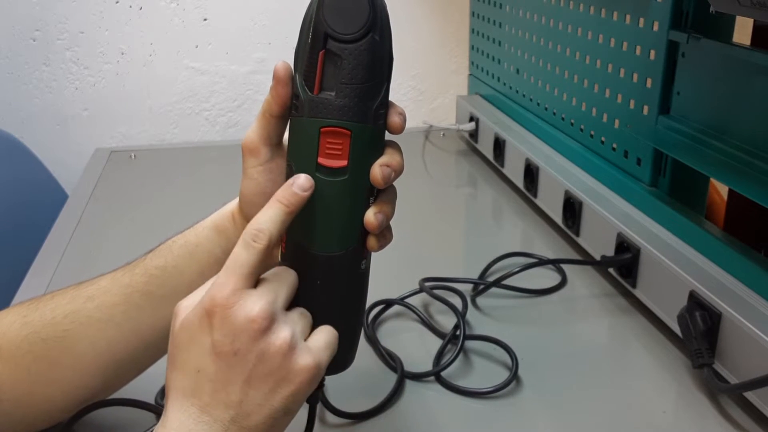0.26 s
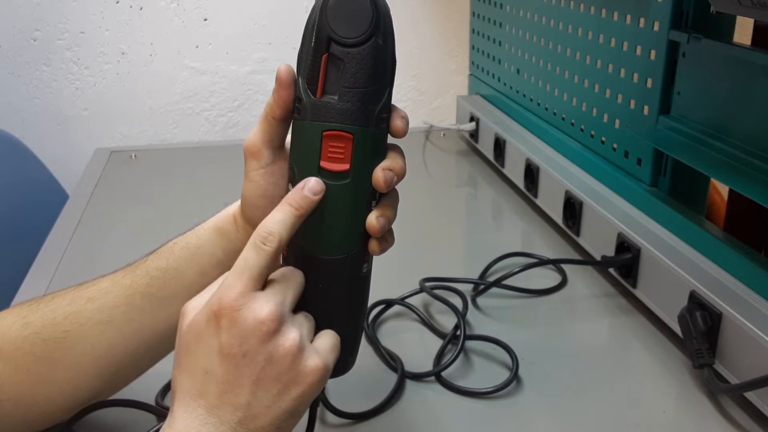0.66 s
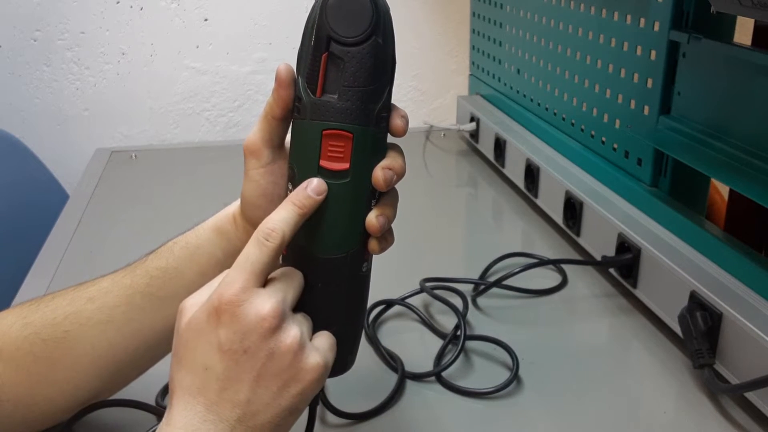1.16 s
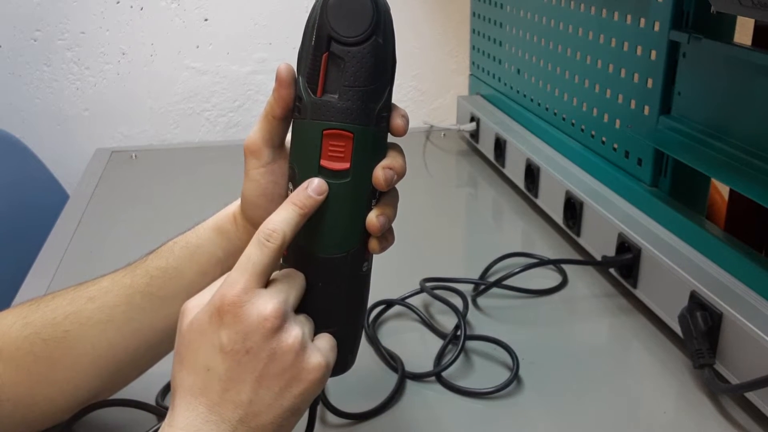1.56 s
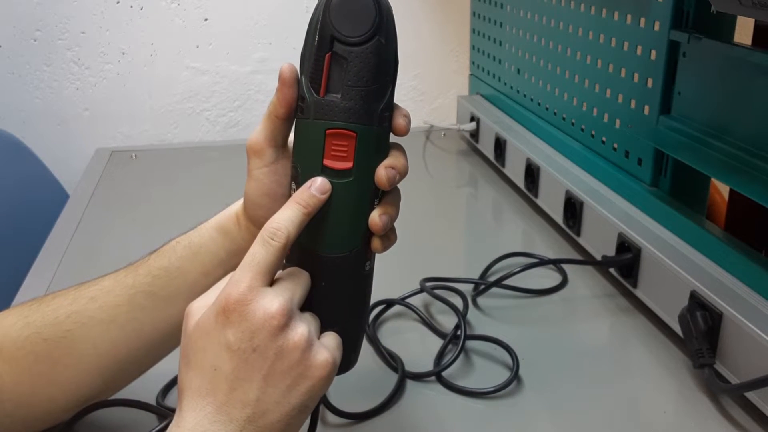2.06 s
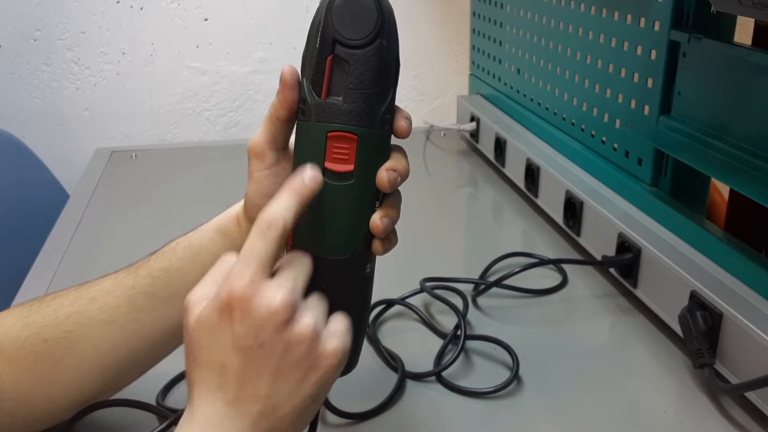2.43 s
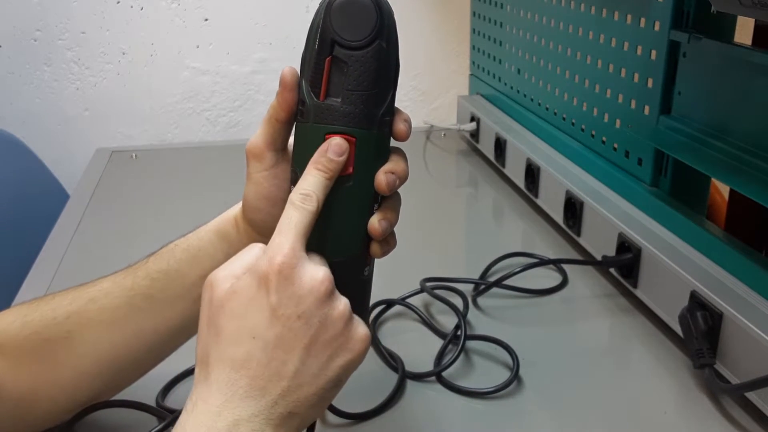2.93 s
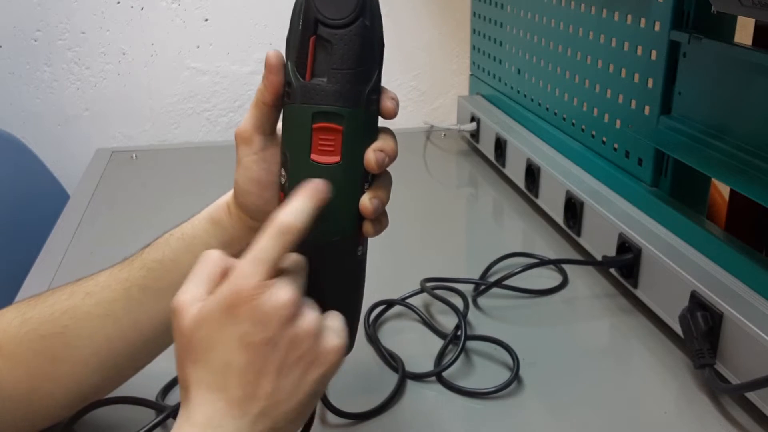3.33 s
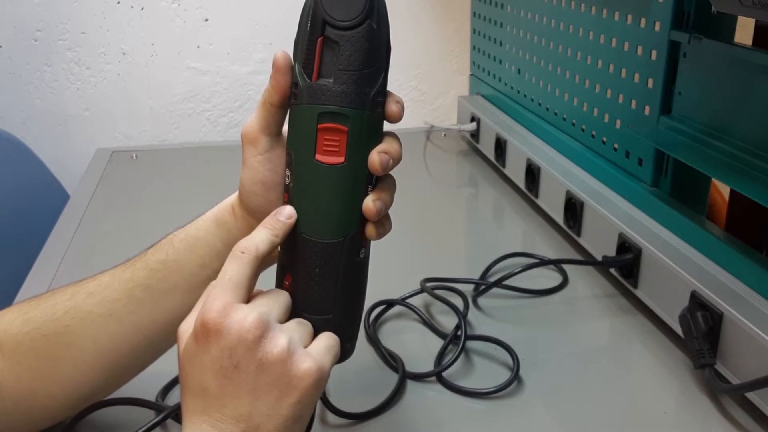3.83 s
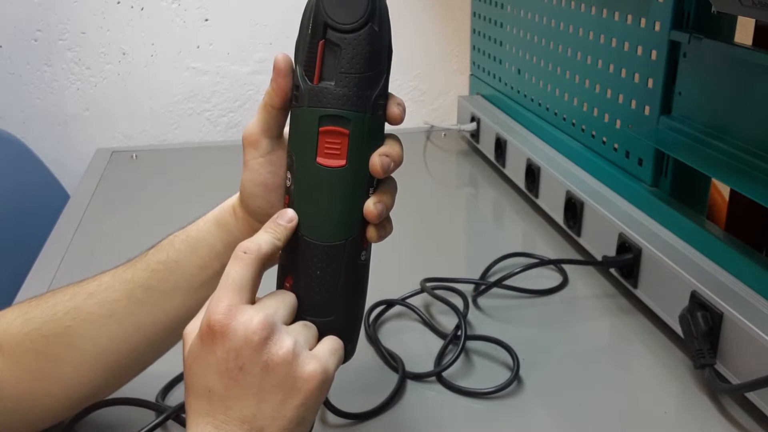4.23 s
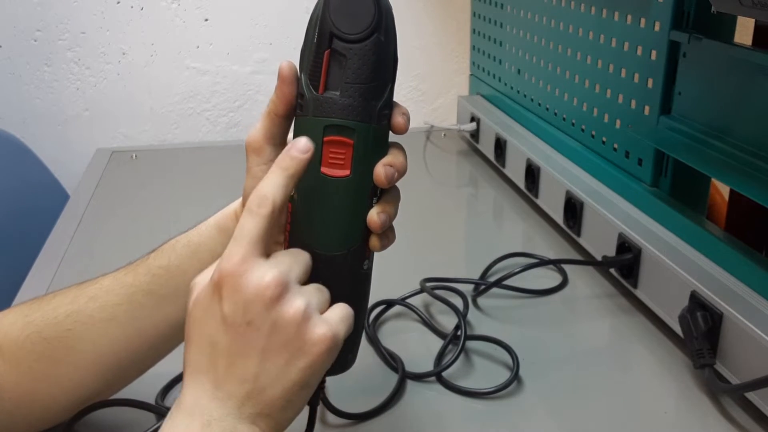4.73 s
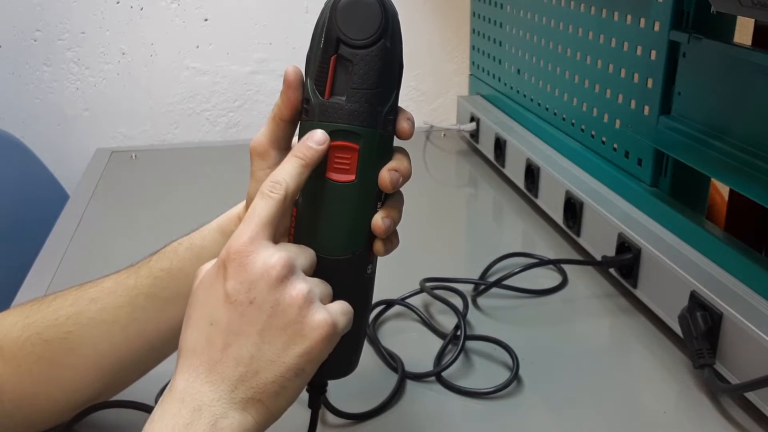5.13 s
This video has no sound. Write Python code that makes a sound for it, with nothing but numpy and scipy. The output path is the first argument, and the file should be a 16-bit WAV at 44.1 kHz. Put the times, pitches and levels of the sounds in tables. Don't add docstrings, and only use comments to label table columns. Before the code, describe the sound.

A handheld oscillating power tool runs unloaded very close to the microphone, a steady harsh buzz with whining motor and fan tones, plastic rattle and airy hiss. About three seconds in it is switched off; the whine slides down, knocks slow and fade over a second and a half. A couple of tiny ticks follow, with low ventilation rumble in a small workshop.

```python
import sys
import numpy as np
from scipy import signal
from scipy.fft import rfft, irfft, next_fast_len
from scipy.io import wavfile
from scipy.ndimage import uniform_filter1d

SR = 44100
rng = np.random.default_rng(int(sys.argv[2]) if len(sys.argv) > 2 else 0)


def inscribe(sig):
    pcm = np.round(np.clip(np.atleast_2d(sig).T, -1, 1) * 32767)
    wavfile.write(sys.argv[1], SR, pcm.astype(np.int16))


def makeup_ratio(level_db):
    decades = np.asarray(level_db, float) / 20
    return 10 ** decades


N = 237258
t = np.arange(N) / SR
size = next_fast_len(N + SR)
bins = np.maximum(np.arange(size // 2 + 1) * SR / size, 1.)

SWITCH_S = 3.03
FAN_ORDER = 39
# (time [s], seating [-1.5 slack to 1.5 tight])
SEATING = [
    (.05, 1),
    (.4, 1.2),
    (.65, 0),
    (1.25, -1.3),
    (1.55, -.6),
    (1.85, -1),
    (2.45, 0),
    (2.97, .6),
]


def tool():
    # (time [s], turns per second [Hz])
    speed = [(0, 282.0), (.4, 282.4), (.7, 283.0), (1.3, 283.6), (1.7, 283.4), (2.4, 283.6), (2.75, 284.1),
             (3.02, 284.3), (3.08, 273), (3.16, 257), (3.36, 224.6), (3.5, 202), (3.82, 144.5),
             (4.11, 94.5), (4.3, 66), (4.55, 28), (4.75, 2)]
    # (time [s], rise [dB], half length [s])
    squeezes = [
        (.27, 6, 0.032),
        (1.362, 4.5, 0.046),
        (1.988, 3, 0.065),
        (2.55, 3, 0.12),
        (3.42, 4.5, .06),
    ]
    # (frequency [Hz], level [dB per Hz])
    body = [(150, -33.5), (250, -8.5), (450, -12.5), (735, -11), (1400, -0.5), (2200, -1), (3200, -2.5),
            (4500, -4.5), (5700, -1.5), (7000, -5), (8500, -11), (11500, -14.5), (13500, -15),
            (15600, -15.5)]
    # (frequency [Hz], width [Hz], boost [dB])
    housing = [(400.4, 47, 12.5), (556, 187, 10.5), (978.5, 35, 12.5), (1227, 130, 0.5), (1390, 110, 5),
               (1547, 87, 3.5), (2027, 180, -0.5), (2600, 50, 7.5), (3460, 60, 2), (4970, 52, 8),
               (5397, 64, 4), (5370, 82, 6), (7660, 110, 6), (11370, 660, 8), (720, 110, -1.5),
               (4520, 370, -4)]

    hz = np.interp(t, *np.transpose(speed))
    turns = np.cumsum(hz) / SR + .0016 * walk(20)

    grip_db = layer_db(hz, full_db=-37, halving_db=4.4, stall_db=2.5)
    grip_db -= np.interp(t, *np.transpose(SEATING)) * (t < SWITCH_S)
    for at, rise_db, half in squeezes:
        grip_db += rise_db * np.exp(-((t - at) / half) ** 2)

    even = np.sqrt(SR / 2 / np.maximum(hz, 20.))
    blows = np.arange(int(2 * turns[-1]))
    clean_db = np.interp(t, [SWITCH_S, SWITCH_S + 0.24, 3.5, 3.8, 4.2], [-38.5, -5.5, -13.5, -10.0, -11])
    clean = makeup_ratio(clean_db) * even * knocks(np.maximum.accumulate(turns), 1.1, .002, (-1.) ** blows)
    either_way = rng.choice([-1., 1.], len(blows))
    loose = makeup_ratio(-8.0) * even * knocks(np.maximum.accumulate(turns), 2.9, 0.024, either_way)

    gate = .7 + np.exp(-(2 * turns % 1) / .3)
    hiss = unit(gate * (rng.standard_normal(N) + 0.843 * rng.standard_normal((2, N))))

    colour_db = curve(body, bins)
    for ring_hz, width_hz, boost_db in housing:
        colour_db = colour_db + boost_db / (1 + (2 * (bins - ring_hz) / width_hz) ** 2)
    colour = causal(colour_db)

    rattle_db = layer_db(hz, full_db=-28.5, halving_db=5.74, stall_db=1.87) + 0.38 * walk(12)
    rattle = unit(shape(clean + loose + hiss, colour * band(1450, 3240))) * makeup_ratio(rattle_db)
    chatter_db = layer_db(hz, full_db=-29, halving_db=5.8, stall_db=2.6) + 1.2 * walk(12)
    chatter = unit(shape(clean + loose + hiss, colour * band(3760, 6500))) * makeup_ratio(chatter_db)
    air_db = layer_db(hz, full_db=-28.5, halving_db=11.7, stall_db=1.4) + .7 * walk(30)
    air = unit(shape(0.59 * loose + hiss, colour * band(7200, 20000))) * makeup_ratio(air_db)
    rumble = loose + rng.standard_normal(N)
    grip = unit(shape(rumble, colour * band(270, 1406))) * makeup_ratio(grip_db + 1.9 * walk(8.46))

    held, sliding = whine(turns, hz)
    heard = ports(rattle + chatter + air + grip + sliding) + held
    return heard + spindle(loose + hiss, hz)


def whine(turns, hz):
    # (multiple of shaft speed, left level [dB], right level [dB], left lead [radians])
    strong = [(1, -45, -59, 2.9), (2, -50, -50, -0.1), (3, -46, -46, -0.5), (4, -47, -62, 0.5),
              (5, -30, -36, 2.1), (6, -42, -46, -0.7), (7, -36, -31, -2.0), (8, -40, -47, 1.7),
              (9, -33, -36, -3.0), (10, -47, -39, 1.5), (11, -40, -38, -0.3), (12, -42, -37, -2.9),
              (13, -31, -35, 0.8), (15, -43, -45, -1.5), (17, -42, -35, -2.6), (18, -35, -44, -2.1),
              (19, -35, -34, -3.1), (20, -34, -37, 0.1), (21, -39, -40, -1.0), (22, -41, -47, -0.2),
              (23, -43, -40, 2.6), (24, -37, -38, 0.3), (39, -36, -36, -0.0)]
    faint = [(14, -46, -47, 0), (16, -51, -51, 0), (25, -46, -48, 0), (29, -50, -50, 0), (31, -49, -48, 0)]
    leaders = {1: (.5, -2, 10), 5: (0, 5, 5), 7: (0, 3.5, 4), 9: (3.5, 0, 18), 11: (4, 5, 14),
               13: (-1.5, 8, 13), 20: (-3.5, 10, 35)}
    coast_fade = {3: 30, 15: 25, 17: 45, FAN_ORDER: 42}
    # (time [s], multiple, level [dB], half length [s])
    surges = [(.2, 7, -37, .3), (.48, 9, -39, .15), (1.39, 6, -34, .05), (1.36, 7, -35, .03),
              (2.26, 6, -38, .06), (2.26, 1, -45, .04), (3.36, 11, -38, .05), (3.47, 7, -43, .1),
              (2.8, 11, -43, .25), (3.25, 9, -39, .08), (3.06, 13, -38, .05), (3.25, 15, -40, .07),
              (3.32, 17, -43, .05), (.8, 5, -41, .35), (3.72, 3, -52, .12)]

    held, sliding = np.zeros((2, N)), np.zeros(N)
    power = np.clip((SWITCH_S - t) / 0.025 + 1, 0, 1)
    seating = np.interp(t, *np.transpose(SEATING))
    coasting_s = np.maximum(t - SWITCH_S, 0)
    for k, left_db, right_db, lead in strong + faint:
        start = (.7 if k % 2 else .9) * rng.standard_normal()
        angle = 2 * np.pi * k * turns + start + .12 * walk(25)
        flutter_db = (3.0 - 2.2 * power) * walk(12)
        if k in leaders:
            seat_db, drop_db, fade_db = leaders[k]
            flutter_db += power * seat_db * seating - (1 - power) * drop_db - fade_db * coasting_s
            lowest_hz = 1300 if k > 1 else 70
            flutter_db -= 42 * np.maximum(np.log2(lowest_hz / np.maximum(k * hz, 1)), 0)
        else:
            wander_db = .8 if k == FAN_ORDER else 2.1
            flutter_db += wander_db * walk(3.01) - coast_fade.get(k, 400) * coasting_s
        wave = np.sqrt(2) * makeup_ratio(flutter_db) * np.exp(1j * angle)
        left = makeup_ratio(left_db) * np.exp(.5j * lead)
        right = makeup_ratio(right_db) * np.exp(-.5j * lead)
        held += power * np.real(wave * np.array([[left], [right]]))
        coast = (1 - power) * wave.real * np.hypot(makeup_ratio(left_db), makeup_ratio(right_db)) / np.sqrt(2)
        direct = 1 if k in (1, 3, FAN_ORDER) else .42
        held += direct * coast
        sliding += .7 * (1 - direct) * coast
    for at, k, db, half in surges:
        swell = np.exp(-((t - at) / half) ** 2)
        held += np.sqrt(2) * makeup_ratio(db) * swell * np.cos(2 * np.pi * k * turns)
    return held, sliding


def knocks(turns, scatter_db, jitter, sign):
    chance = rng.standard_normal((len(sign), 2)).T
    at = np.interp(np.arange(len(sign)) / 2 + jitter * chance[0], turns, np.arange(N))
    force = sign * makeup_ratio(scatter_db * chance[1])
    whole = np.clip(at.astype(int), 8, N - 9)
    taps = np.arange(-7, 9)
    u = taps - (at - whole)[:, None]
    pulse = np.sinc(u) * np.cos(np.pi * np.clip(u / 16, -.5, .5)) ** 2
    return np.bincount((whole[:, None] + taps).ravel(), (force[:, None] * pulse).ravel(), N)


def spindle(shaking, hz):
    ring = unit(shape(shaking, 1 / (1 + 2j * (bins - 2087) / 143)))
    ring_db = layer_db(hz, full_db=-39.5, halving_db=1, stall_db=5.6) + 2.5 * walk(15)
    return ring * makeup_ratio(ring_db) * np.clip((t - SWITCH_S) / .5, 0, 1)


def layer_db(hz, full_db, halving_db, stall_db):
    slower = 283.5 / np.maximum(hz, 2.)
    return full_db - halving_db * np.log2(slower) - stall_db * np.maximum(slower - 1, 0) ** 1.25


def ports(x):
    # (frequency [Hz], left lead [radians])
    lag = [(0, 0), (860, 0), (1380, 2.5), (1980, -1.5), (2580, 4), (3270, -1), (3530, -7.5), (5000, -4.5),
           (5680, -12.5), (5940, -10.5), (6630, -19.5), (6890, -10), (7580, -13), (16500, -12)]
    # (frequency [Hz], left minus right [dB])
    lean = [(60, -5), (110, -3.5), (200, 12.5), (380, -1), (700, 8.5), (1290, 0), (2380, 0), (4400, 0),
            (8120, -1), (15000, 2.5)]
    # (frequency [Hz], direct share of power)
    alike = [(250, 0.92), (700, 0.9), (1500, 0.6), (4000, 0.47), (8000, 0.69), (15000, .8)]

    share = np.clip(curve(alike, bins), 0, 1)
    half = np.interp(bins, *np.transpose(lag)) / 2 * 1j + curve(lean, bins) * np.log(10) / 40
    tail = rng.standard_normal((2, SR // 2)) * np.exp(-np.log(1000) * t[:SR // 2] / .3)
    diffuse = rfft(tail / np.sqrt(np.sum(tail ** 2, 1, keepdims=True)), size)
    direct = np.exp(np.array([half, -half]))
    return shape(x, np.sqrt(share) * direct + np.sqrt(1 - share) * diffuse)


def ticks():
    # (time [s], peak level [dB], ring frequency [Hz])
    cracks = [
        (4.456, -49, 5700),
        (5.032, -48, 11800),
        (5.231, -57, 12300),
    ]
    out, u = np.zeros(N), t[:2000]
    for s, db, hz in cracks:
        i = int(s * SR)
        crack = 1.6 * rng.standard_normal(2000) + 1.6 * np.sin(2 * np.pi * hz * u)
        out[i:i + 2000] += makeup_ratio(db) * np.exp(-u / .003) * crack
    return shape(out, band(900, 20000) / np.sqrt(1 + (bins / 4500) ** 4))


def shop():
    # (frequency [Hz], level [dB per Hz])
    rumble = [(15, -61.5), (30, -35.5), (60, -13.5), (130, -3), (200, -8.5), (290, -16), (600, -19),
              (800, -24), (1300, -19.5), (2500, -27), (4200, -38.5), (7000, -47.5), (11000, -52),
              (15700, -52.5)]
    # (frequency [Hz], side minus middle [dB])
    spread = [(60, -11), (110, -25), (200, -7), (380, -11), (700, -4), (1290, -1), (2380, 1.5),
              (4400, -0.5), (8120, -4.5), (15000, -18)]
    # (frequency [Hz], level [dB])
    blades = [(255, -54), (766, -70)]

    mid, side = rng.standard_normal((2, N))
    colour = makeup_ratio(curve(rumble, bins))
    air_db = -48.5 + .7 * walk(6)
    mid = shape(mid, colour)
    side = shape(side, colour * makeup_ratio(curve(spread, bins)))
    air = makeup_ratio(air_db) / np.std(mid) * np.array([mid + side, mid - side])
    hum = np.zeros(N)
    for hz, db in blades:
        loudness = np.sqrt(2) * makeup_ratio(db + 0.43 * walk(6.5))
        hum += loudness * np.sin(2 * np.pi * hz * t + 0.18 * walk(5.4))
    return air + hum * makeup_ratio(np.array([[1.5], [-1.5]]))


def curve(table, hz):
    f, v = np.transpose(table)
    return np.interp(np.log(hz), np.log(np.maximum(f, 1.)), v)


def shape(x, gain):
    return irfft(rfft(x, size) * gain, size)[..., :N]


def causal(db):
    c = irfft(db * np.log(10) / 20, size)
    c[1:size // 2] *= 2
    c[size // 2 + 1:] = 0
    return np.exp(rfft(c))


def band(lo_hz, hi_hz):
    return np.sqrt(1 / (1 + (lo_hz / bins) ** 8) / (1 + (bins / hi_hz) ** 8))


def unit(x):
    return x / np.sqrt(np.mean(x ** 2))


def walk(rate):
    k = int(SR / rate)
    steps = np.repeat(rng.standard_normal(N // k + 1), k)
    return 1.4 * uniform_filter1d(uniform_filter1d(steps, k), k)[:N]


def scene():
    return tool() + shop() + ticks()


def low_pass(x):
    return signal.sosfilt(signal.butter(12, 16870, fs=SR, output="sos"), x)


def record(dry):
    mix = shape(dry, bins < 15740)
    return low_pass(mix)


dry = scene()
out = record(dry)
inscribe(out)
```